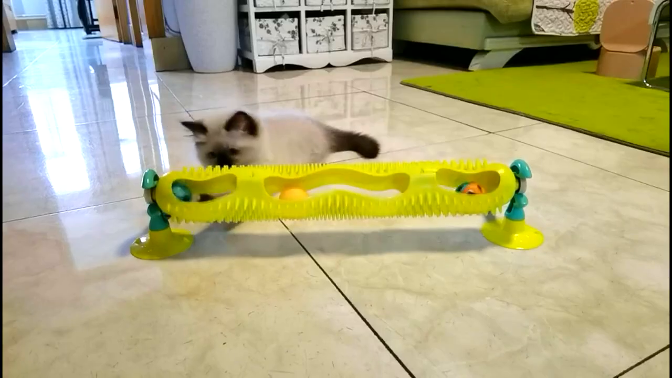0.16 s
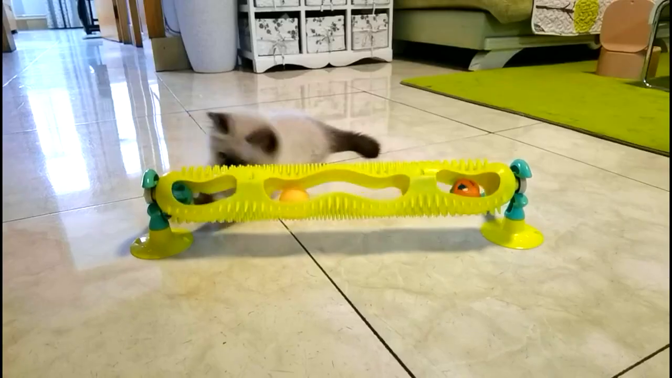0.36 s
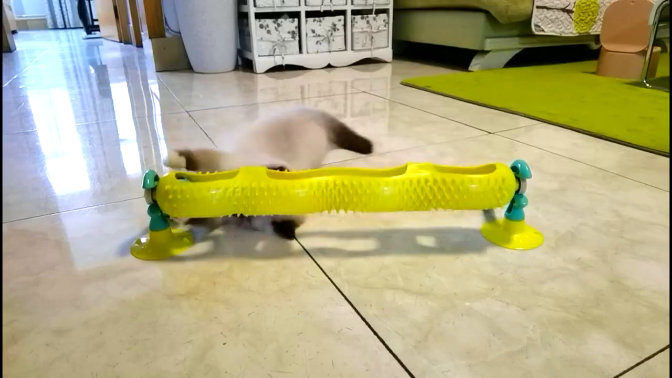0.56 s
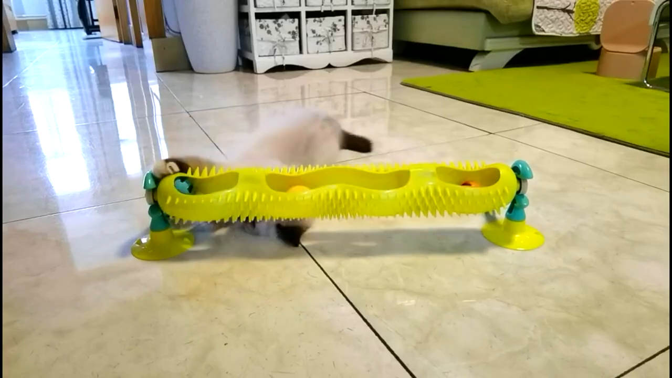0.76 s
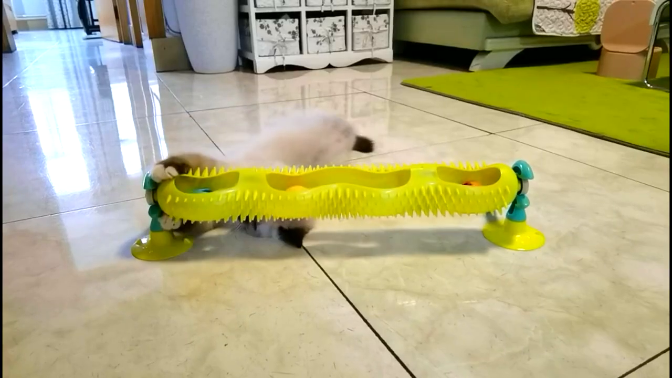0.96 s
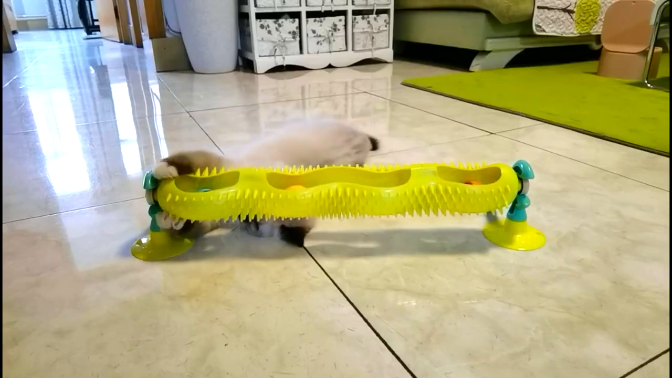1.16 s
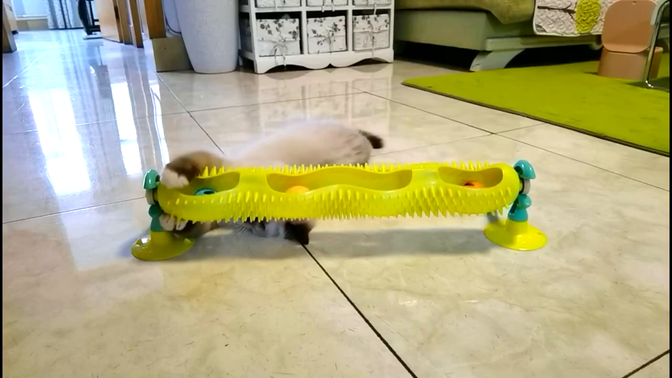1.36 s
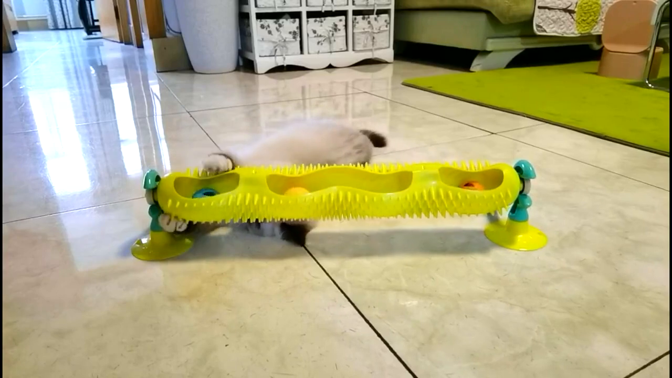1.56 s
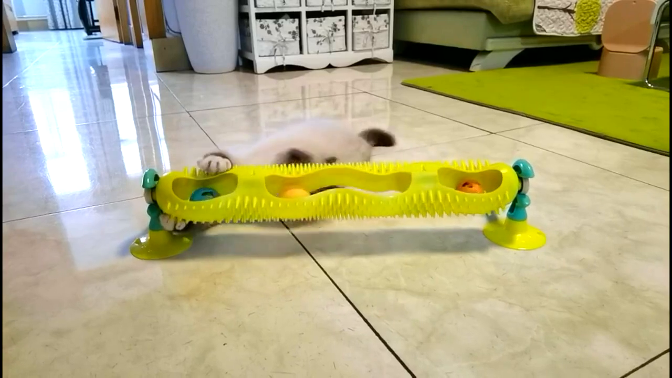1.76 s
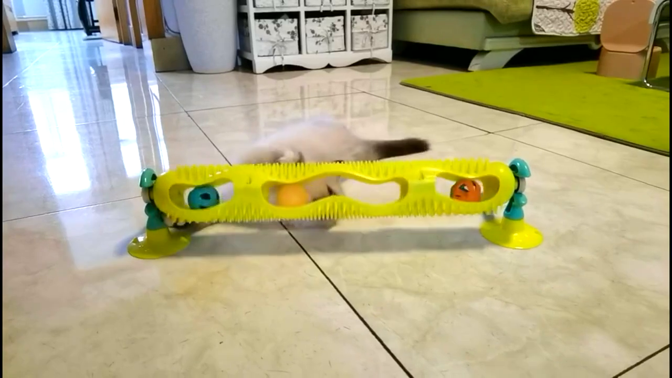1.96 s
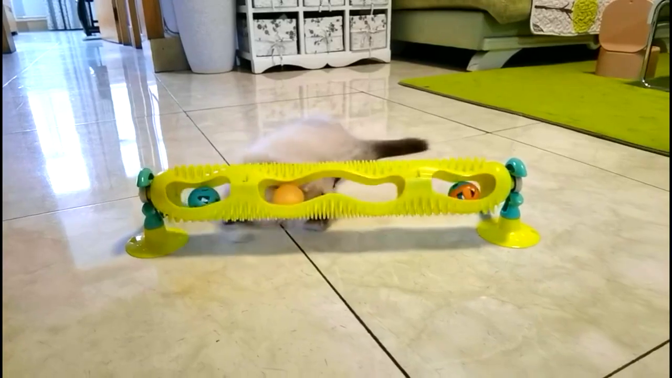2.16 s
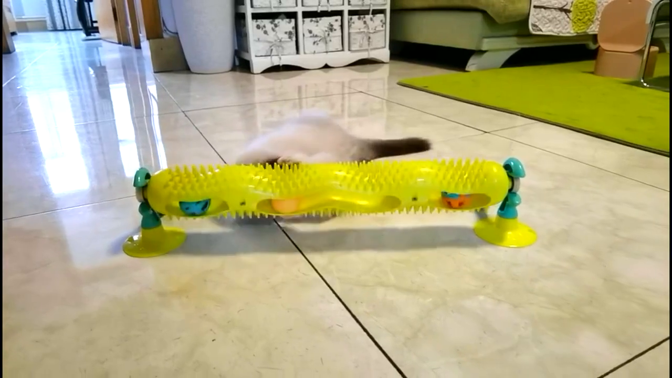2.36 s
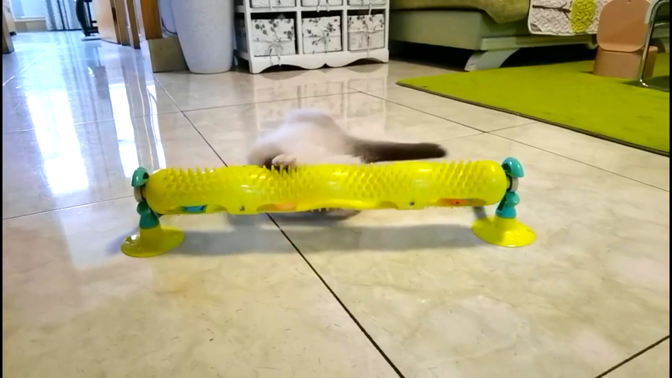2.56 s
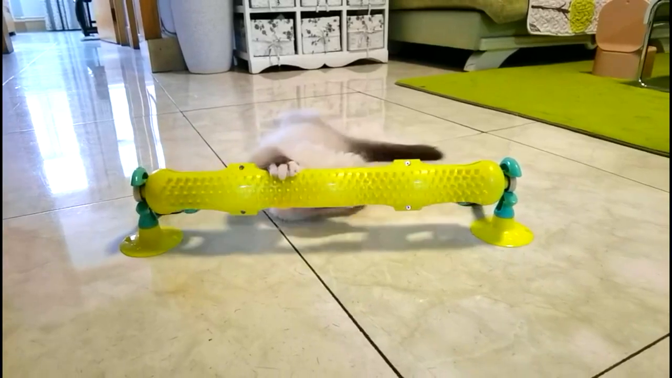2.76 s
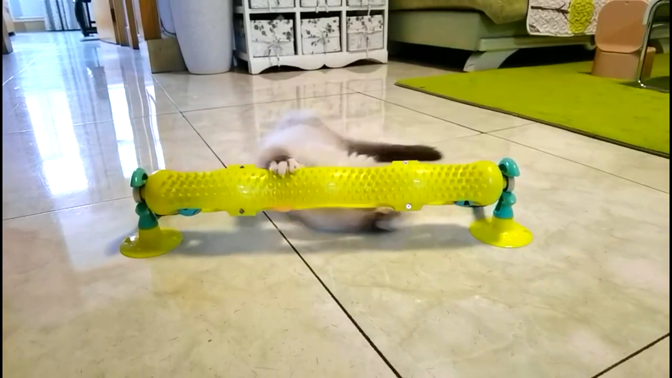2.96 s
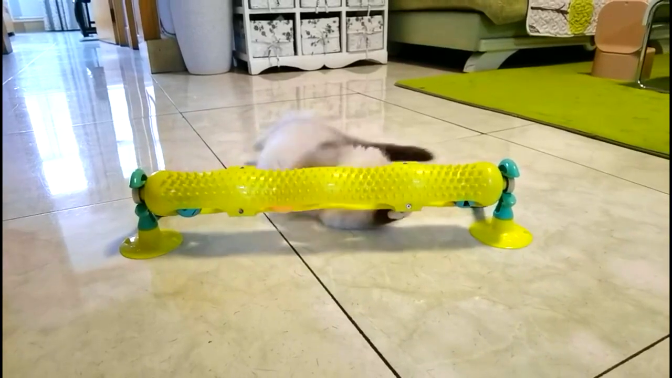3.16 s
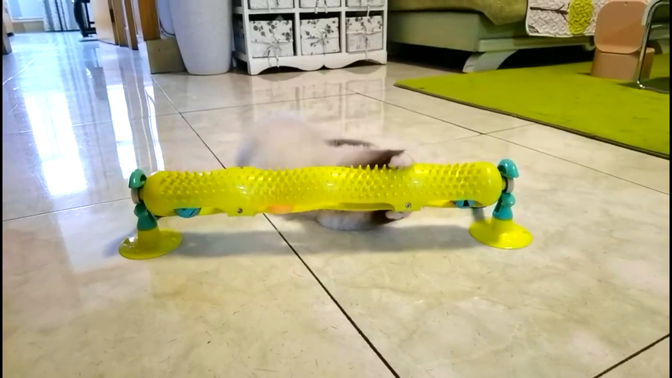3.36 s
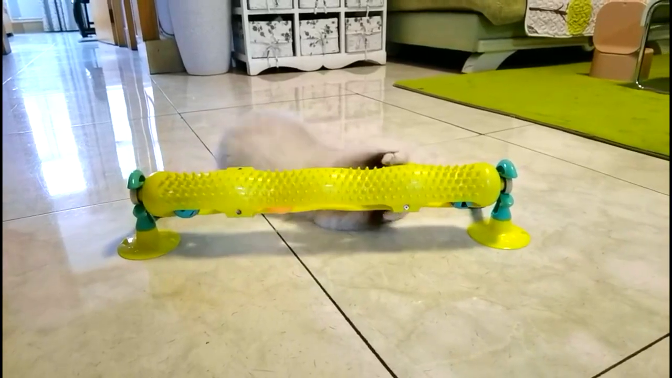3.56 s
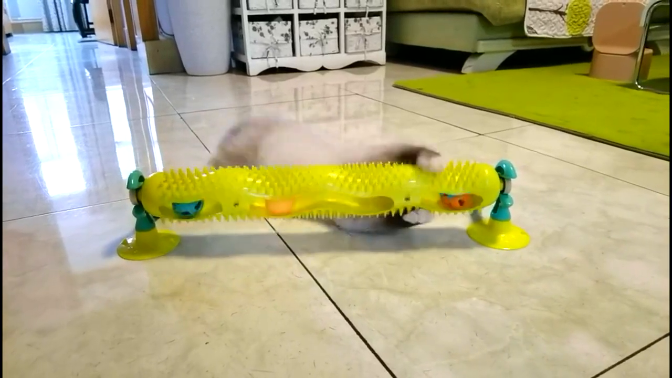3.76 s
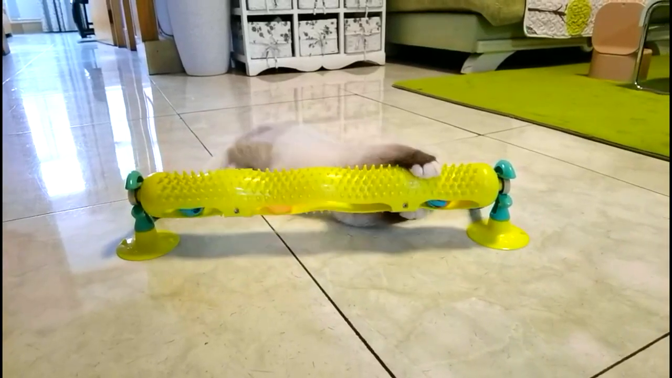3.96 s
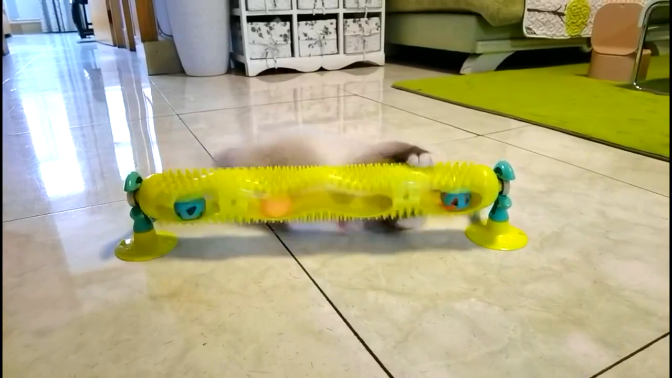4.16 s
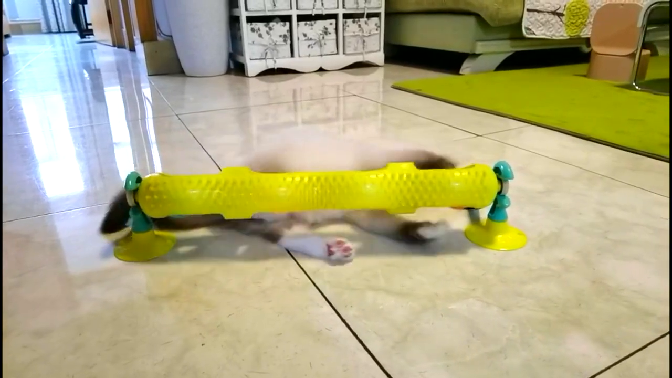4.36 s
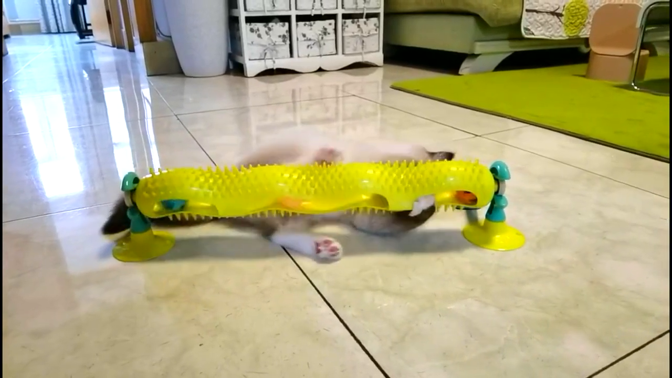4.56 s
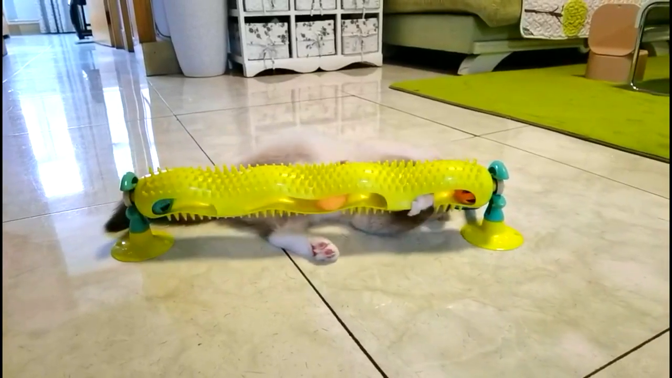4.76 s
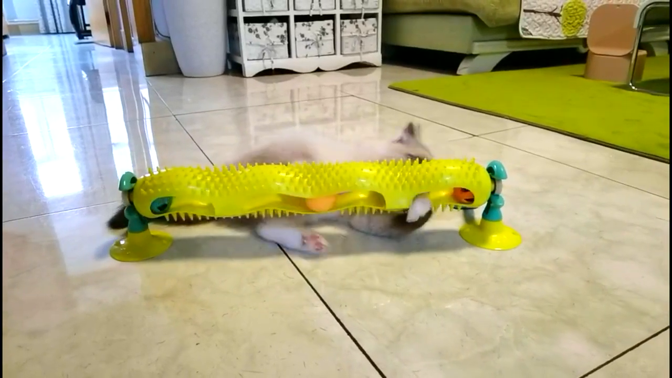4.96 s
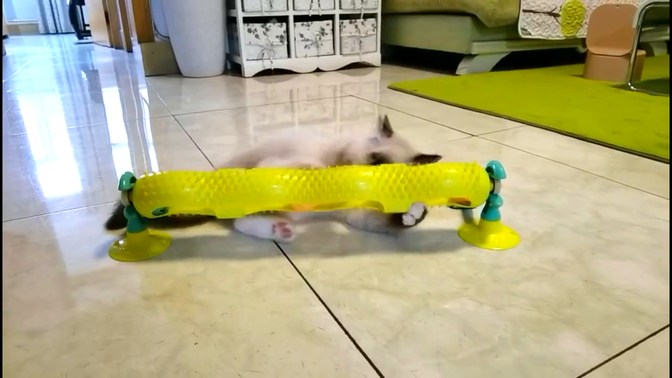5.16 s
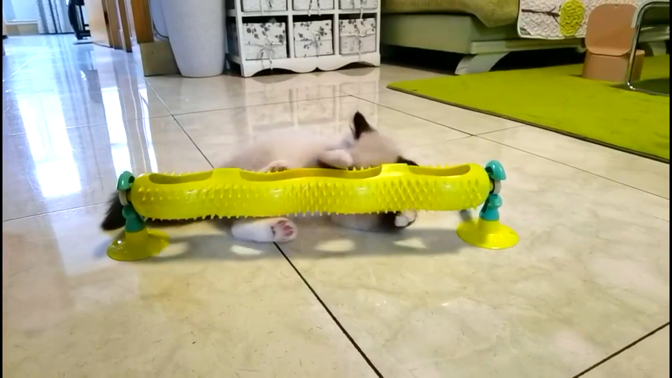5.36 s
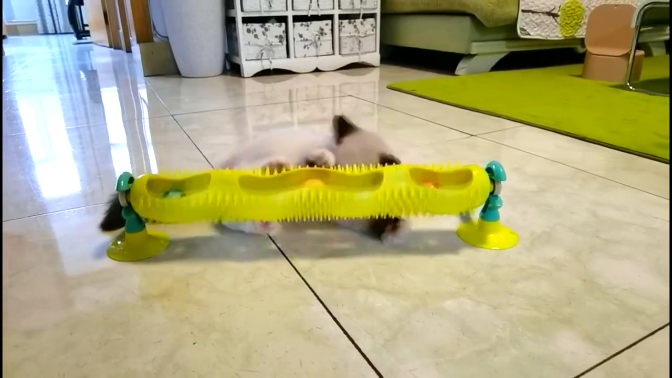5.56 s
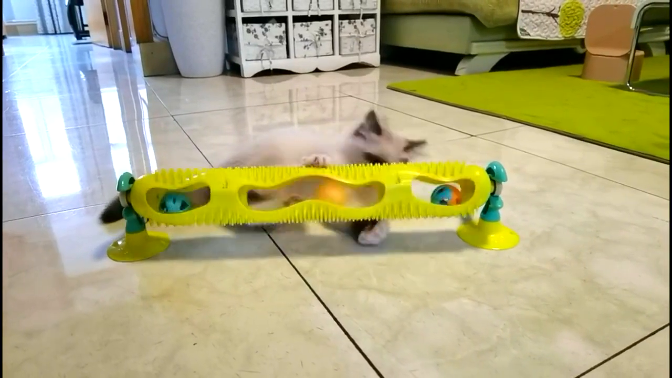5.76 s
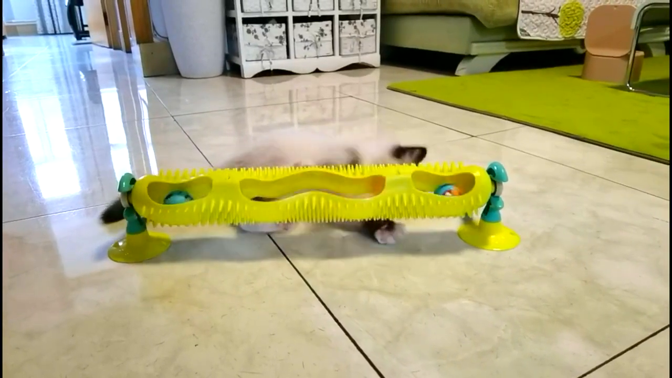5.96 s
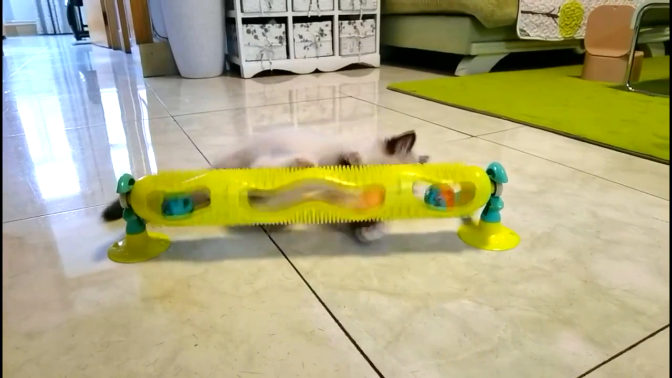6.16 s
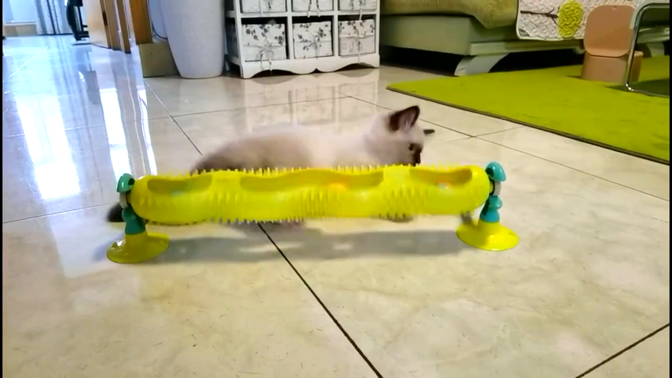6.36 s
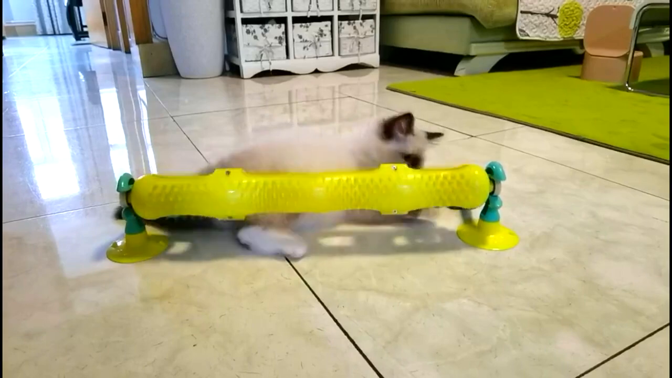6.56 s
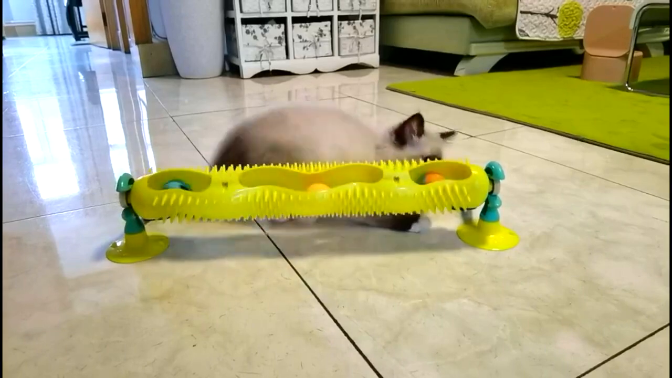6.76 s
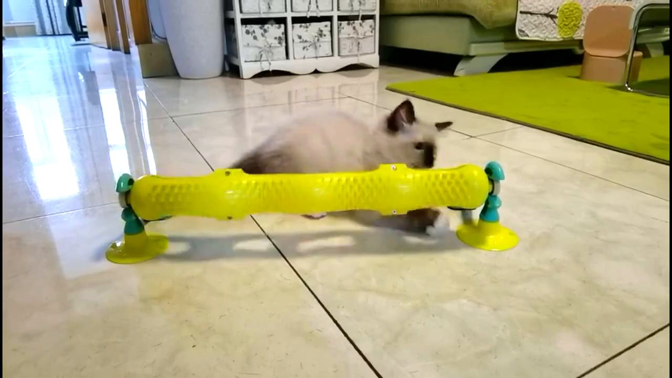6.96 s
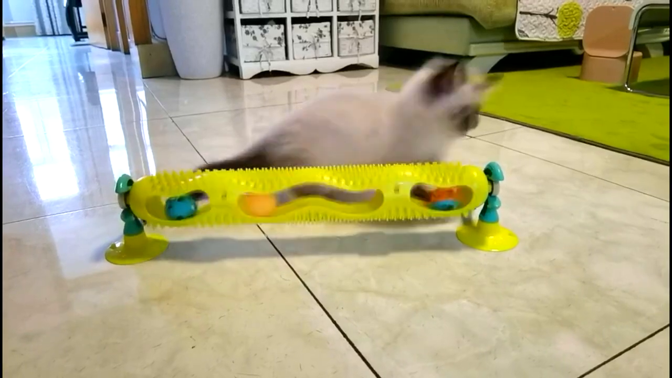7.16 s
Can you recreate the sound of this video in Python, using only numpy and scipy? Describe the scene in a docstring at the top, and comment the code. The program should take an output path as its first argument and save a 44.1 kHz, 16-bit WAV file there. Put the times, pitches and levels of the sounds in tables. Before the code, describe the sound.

A kitten bats a pivoting plastic tube on a tiled living room floor. Small hollow balls click and rattle in quick bursts, with brief rolling and dry claw scrapes. A busy opening fades to near quiet before two seconds, then light ticking, another lull, and stronger rattles with low stand thumps from about four seconds. Close stereo microphone, short room reflections, faint air and hum.

```python
"""In a tiled living room a kitten bats at a plastic tube that pivots on two suction feet.
Hollow balls in the tube click as resonators driven by short impacts, each doubled by a reflection off the tiles.
Rolling, claw scrapes and stand rumble are random impacts filtered by spectra and shaped by strokes.
Decaying noise forms the room's reverberation; filtered noise and wavering sines form the air and the
faint hum of an appliance. Phase and level differences between left and right give the stereo image."""
import sys
import numpy as np
from scipy import signal
from scipy.fft import rfft, irfft, next_fast_len
from scipy.io import wavfile
from scipy.ndimage import map_coordinates

SR = 44100
rng = np.random.default_rng(int(sys.argv[2]) if len(sys.argv) > 2 else 0)


def dump(signal):
    """Clip the signal to [-1, 1] and save it as 16-bit WAV at the path in sys.argv[1]."""
    limited = np.clip(np.atleast_2d(signal).T, -1, 1)
    pcm = np.round(limited * 32767).astype(np.int16)
    wavfile.write(sys.argv[1], SR, pcm)


N = 318388  # samples in the scene

# still air, relative spectrum: [f/Hz, level/dB]
AIR_SPECTRUM = [(20, -1), (75, -6.5), (106, -8.5), (141, -8.5), (300, -11.5), (350, -16), (480, -14),
                (670, -21), (960, -25), (3300, -39), (7500, -36), (10000, -41.5)]
# partials of the appliance: [f/Hz, rms level/dB]
HUM_PARTIALS = [(72, -78), (141, -77), (215, -93.5), (497, -81.5)]
# paw strokes that swing the tube: [t/s, hold/s, rolling level/dB, scraping level/dB], levels before trim
PAW_SWIPES = [ (0.0, 0.11, -56, -66), (0.135, 0.051, -49, -58.5), (0.24, 0.25, -65, -96),
              (0.41, 0.2, -54, -65.5), (0.845, .07, -54.5, -61), (1.0, 0.037, -74, -71),
              (1.996, 0.15, -59.5, -64.5), (2.241, 0.073, -65, -80), (2.642, 0.029, -58, -62.5),
              (2.73, 0.15, -73.5, -82), (3.02, 0.15, -82, -89), (3.515, 0.017, -68.5, -72.5),
              (3.711, 0.082, -50.5, -55.5), (4.127, 0.12, -59.5, -54.5), (4.26, 0.24, -52, -61),
              (4.51, 0.17, -57.5, -67), (5.03, 0.054, -58.5, -71.5), (5.329, 0.036, -50, -59),
              (5.399, 0.12, -83, -90), (5.549, 0.11, -64, -69.5), (5.7, 0.1, -58, -74),
              (5.914, 0.033, -56, -77), (6.144, 0.042, -52, -58.5), (6.313, 0.086, -49.5, -51),
              (6.47, 0.053, -49, -51.5), (6.928, 0.14, -52, -69), (7.08, 0.077, -57, -59.5)]
# the kitten shakes the stand on its suction feet: [t/s, rumble level/dB before trim]
STAND_JOLTS = [ (2.635, -55), (3.73, -55.5), (4.139, -53), (4.253, -45), (4.372, -48), (4.419, -55.5),
               (4.54, -55.5), (4.67, -55.5), (5.322, -49.5), (6.355, -47), (6.512, -46.5), (6.909, -53)]
# rolling balls, relative spectrum: [f/Hz, level/dB]
ROLL_SPECTRUM = [(120, -49), (300, -18.5), (600, 1), (950, -2.5), (1550, -1.5), (1800, -4.5), (2030, 6.5),
                 (2230, -6.5), (2450, 9.5), (2750, -10), (3200, -12.5), (5000, -18.5), (9000, -37.5)]
# hard ticks and claw scrapes, relative spectrum: [f/Hz, level/dB]
TICK_SPECTRUM = [(1500, -33.5), (2800, 6.5), (3400, -1), (4050, 7), (4400, 2), (5200, 1), (5950, 4.5),
                 (6700, -1), (7350, -3.5), (8200, 2.5), (9400, 4.5), (11000, -57.5)]
# shaken stand, relative spectrum: [f/Hz, level/dB]
RUMBLE_SPECTRUM = [(40, -9), (75, 6), (110, -4), (170, -1), (290, 7), (500, -14.5), (900, -15)]
# contacts of balls, tube and claws: [t/s, level/dB over the first 5 ms, knock share/dB,
# tick share/dB before brightening, favoured ring f/Hz, tick centre f/Hz, buzz decay/ms before its floor]
CONTACTS = [(0.003, -48, -14, -29.5, 2370, 3540, 0.6), (0.03, -41.5, -24, -7, 2450, 5600, 0.88),
            (0.0707, -30.5, -10, -6.5, 2200, 6500, 1.1), (0.156, -47, -1.5, -21, 1600, 4700.0, 0.89),
            (0.1925, -37, -8.5, -11, 2007, 7600, 2), (0.298, -56, 1, -23, 966, 3500, 1.7),
            (0.322, -49, -2.5, -18, 2020, 3500.0, 2.5), (0.343, -47, -5.5, -16, 1980, 3500.0, 0.8),
            (0.388, -55, -6.5, -28, 1600, 7450, 0.78), (0.399, -33, -12, -12.5, 2107, 7300, 1.2),
            (0.456, -44.5, -21.5, -21.5, 2150, 7450, 2.5), (0.467, -53, -3, -20.5, 2430, 4530, 1.0),
            (0.5005, -41, -7, -9.5, 1015, 6050, 3), (0.508, -41, -8.5, -2, 2440, 3900, 1.0),
            (0.5136, -40.5, -7, -27, 2143, 4620, 0.28), (0.549, -42, -8.5, -11.5, 1960, 7000, 1.9),
            (0.5546, -31.5, -4, -31, 1890, 7500, 0.34), (0.661, -47, -4.5, -15, 2460, 6400, 0.68),
            (0.811, -45, -3, -13, 1995, 5370, 0.44), (0.837, -30.5, -7, -8.5, 1840, 5140, 0.55),
            (0.886, -41, -1.5, -13, 1220, 5840, 0.54), (0.903, -46.5, -0.5, -21, 804, 7700.0, 0.55),
            (0.993, -54, -6.5, -15, 2000, 6840, 6.1), (1.027, -50, -8.5, -12.5, 2340, 5400, 2.8),
            (1.107, -58, -4.5, -13, 1970, 5200.0, 7.1), (1.123, -54.5, -24.5, -4, 2470, 5370, 2.7),
            (1.999, -53, -25, -9, 2470, 4300.0, 2.2), (2.015, -50.5, -1.5, -6.5, 2400, 5640, 0.39),
            (2.066, -49.5, -9, -16, 2260.0, 4870, 1.2), (2.116, -57.5, -12, 1, 1840.0, 6450, 4.2),
            (2.133, -52.5, -6.5, -20, 2130, 5260, 2.5), (2.151, -54.5, -14, -11, 2180, 5300, 5.5),
            (2.236, -60.5, -16, -10, 2400, 4300.0, 16), (2.355, -48.5, -12.5, -25, 2420, 3700.0, 1.7),
            (2.465, -55, -12.5, -22, 2390, 6040, 1.6), (2.499, -56, -4.5, -29, 2280, 6600.0, 0.95),
            (2.53, -57.5, -5, -27, 2160.0, 6400.0, 2.1), (2.55, -53.5, -9, -18, 1970, 6900.0, 2),
            (2.585, -56.5, -16, -11.5, 1990, 5300.0, 0.88), (2.619, -44.5, -10.5, -5, 2340.0, 4670, 1.3),
            (2.631, -39, -10, -6.5, 2600, 3380, 1.4), (2.657, -48.5, 1, -6, 1250, 4200.0, 8.7),
            (2.664, -46, -2, -13, 2080, 3900.0, 0.6), (2.693, -46.5, -2.5, -3.5, 1050, 6600, 4.5),
            (2.762, -59.5, -17, -14, 1930, 4200.0, 4.5), (2.879, -55.5, -24, -2, 2750, 6400, 4.8),
            (2.889, -54.5, -26, 5, 2710.0, 4830, 2.9), (2.974, -63, -17, 1, 2620.0, 6040, 3.2),
            (3.022, -61, -26, -15, 2770, 5330, 12), (3.085, -67, -23, -24, 2540, 6560, 0.63),
            (3.15, -68, -14, -22, 2580, 5700.0, 0.6), (3.242, -67.5, -3, -15, 2590, 5700, 3),
            (3.705, -47.5, -49.5, -5, 2580, 8140, 1.8), (3.749, -47.5, -11.5, -29, 2300, 7000.0, 0.29),
            (3.775, -47, -4, -17, 2080, 6540, 3), (3.794, -43, -8, -7, 2500, 5670, 0.6),
            (3.805, -47, -7, -9, 2190.0, 6840, 0.43), (3.864, -58, -37, -18, 2430.0, 4700.0, 0.59),
            (3.904, -52, -23, -20, 2040, 4100.0, 0.55), (3.975, -59, -2.5, -21, 2380, 5700.0, 4.6),
            (4.03, -58.5, -4.5, -23, 2030, 7100.0, 3.5), (4.062, -53, -7.5, -29, 1940, 4900.0, 0.84),
            (4.07, -57.5, -1, -35, 2010, 5000.0, 0.44), (4.134, -45, -4, -11, 2400, 7100, 9),
            (4.141, -37, -10, -13, 2250, 7450, 0.78), (4.256, -32, -6.5, -7.5, 1260, 4300, 3.7),
            (4.274, -45, 0.5, -16, 1100, 7000, 1.1), (4.315, -46, -6.5, -2.5, 2430, 6200, 1.1),
            (4.365, -41, -7, -12, 2290, 6400.0, 4.7), (4.376, -30, -6.5, -12.5, 2510, 6000, 6.4),
            (4.392, -40.5, -8, -5.5, 2430, 5840, 9.1), (4.409, -42, 8, -22, 870, 5800, 1.6),
            (4.425, -44.5, -8.5, -18.5, 1100, 6500.0, 0.14), (4.44, -43, -3.5, -4, 2470.0, 5840, 1.7),
            (4.511, -39.5, -3.5, -19, 1520, 5130, 3), (4.539, -31.5, -10.5, -14, 2040, 8300, 2.3),
            (4.544, -39, -2.5, -8, 2000, 8300.0, 1.9), (4.557, -36, -3, -12, 1550, 3260, 5.2),
            (4.66, -40.5, -14.5, -12.5, 2500, 4330, 0.65), (4.67, -38.5, -5, -11, 2420, 3800, 1.7),
            (4.688, -50, 5.5, -3, 2070.0, 6800, 0.78), (4.908, -33, -21.5, -7.5, 2050, 4040, 0.2),
            (4.9087, -37, 1.5, -9, 1560, 5200, 1.2), (5.221, -45.5, -7.5, -14, 2230, 3650, 6.5),
            (5.278, -43, -12.5, -16, 2460, 3380, 5.9), (5.299, -48.5, -2, -8, 2310.0, 6960, 5.9),
            (5.321, -36.5, -6, -9.5, 2210, 8600, 1.5), (5.345, -36.5, -3, -10, 2100, 4700, 7.4),
            (5.365, -46, -4.5, -15, 650, 4300.0, 2.9), (5.483, -48.5, -6, -4.5, 2780, 4100, 11),
            (5.697, -44.5, -11, -12.5, 2540, 4300.0, 2.3), (5.708, -48.5, -6.5, -24, 2390, 5100.0, 0.55),
            (5.727, -51.5, -6, 5, 2370, 6000, 2.4), (5.757, -46, -8, -4, 2210, 6500.0, 11),
            (5.852, -57, -10, -2, 1960, 4350, 3), (5.882, -46.5, -5, -11.5, 1920, 4300, 1.1),
            (5.907, -42.5, -1, -14, 1420, 4000, 0.41), (5.922, -50.5, -2, -6, 2470, 3880, 0.43),
            (5.935, -55, 1, -28, 1210, 4000, 4.6), (6.062, -56.5, -11, -14, 2030, 7550, 0.53),
            (6.153, -38.5, -18.5, -4.5, 2420, 7160, 4), (6.16, -42.5, -10, -19, 2340, 6400, 2.5),
            (6.189, -43, -6, -21.5, 2300, 7400.0, 1.9), (6.229, -49.5, -19, 2, 2260, 7060, 3.3),
            (6.335, -45, -5, -6, 2470.0, 5200.0, 11), (6.352, -35.5, -7.5, -9, 2015, 5160, 3.1),
            (6.357, -35, -7, -32, 2060.0, 4300.0, 0.55), (6.381, -43.5, -2, -0.5, 2240.0, 6100.0, 0.55),
            (6.467, -26, -12, -15.5, 2440, 5940, 3), (6.489, -35.5, 4.5, -0.5, 1150, 5400.0, 0.4),
            (6.501, -38.5, -1.5, -3, 2370, 5930, 6.2), (6.509, -34.5, -7.5, -4.5, 2400, 6100, 6.7),
            (6.524, -45, -9, -4, 2430, 5900, 2), (6.537, -38, -21, -19, 2510, 4770, 2.3),
            (6.553, -37.5, -28, -3.5, 2370, 5400, 0.84), (6.86, -59.5, -8, -10, 2530, 8400, 20),
            (6.908, -35.5, -3, -8, 2240, 5350, 6.8), (6.919, -35.5, -7, -9.5, 2730, 4960, 0.26),
            (6.941, -47, -2.5, -10, 1800, 5270, 8.1), (6.969, -50, -2.5, -7, 620, 5700.0, 5.9),
            (7.019, -46.5, -8, 1.5, 2520, 4300, 0.94), (7.08, -45.5, -3, -10, 600, 4710, 2.7),
            (7.089, -42.5, -28, -19, 2280, 6200.0, 1.6), (7.152, -46, -3, -8, 1500, 6500, 0.69),
            (7.175, -49.5, -15, -27, 2380, 5200.0, 0.73), (7.2, -46, -10.5, -15.5, 2280, 4740, 2.1)]
# resonances of the hollow balls: [f/Hz before detuning, nominal width/Hz, relative level/dB]
BALL_RESONANCES = [(2037, 250, 0.5), (2409, 290, 1), (2750, 90, -0.5)]
# tube knock, relative spectrum: [f/Hz, level/dB]
KNOCK_SPECTRUM = [(100, -23.5), (280, -15), (430, -7.5), (560, 0), (750, -2), (950, 2.5), (1250, -0.5),
                  (1550, 4), (1850, -9.5), (3000, -34.5)]
# the play moves along the tube: [t/s, mean phase by which the ring leads on the left/rad]
PLAY_BEARING = [(1.1, -0.62), (2.2, 0.43), (4.4, 0.16), (6.4, -0.22)]
# how far each frequency takes on its contact's own lead: [f/Hz, share]
RING_LEAD_SHARE = [(700, 0.1), (2100, 0.65), (3000, 0.3), (4500, 0.043)]
# reverberation time: [f/Hz, time to fall 60 dB/s]
ROOM_T60 = [(200, 0.32), (800, 0.3), (2200, 0.17), (5500, 0.24), (10000, 0.067)]
# phase between left and right, by frequency: [f/Hz, phase by which left leads/rad]
LEFT_LEAD_PHASE = [(2800, 0.97), (3900, -2.5), (5300, -2.5), (6400, -5)]
# gain of the half-difference between left and right: [f/Hz, level/dB]
SIDE_GAIN = [(250, -12.5), (600, -9.5), (1100, -6), (2200, -0.5), (4600, -1), (7000, -3.5)]

# the balls coast on after the claws let go
SWIPE_ATTACK_S, ROLL_FALL_DB_PER_S, SCRAPE_FALL_DB_PER_S = 0.018, 194, 301
JOLT_ATTACK_S, JOLT_HOLD_S, JOLT_FALL_DB_PER_S = 0.0081, 0.0097, 288.5
BEARING_SPREAD_RAD = 0.3  # from one contact to the next
PRE_BLOW_S = 1 / 100  # room for the lead-in ahead of each blow
BAND_LIMIT_HZ = 9850


def amp(db):
    """A level in decibels is twenty times the logarithm of the amplitude gain."""
    return 10 ** (np.asarray(db) / 20)


def unit(x):
    """Division by the root mean square sets the rms to 1."""
    return x / np.sqrt(np.mean(x ** 2) + 1e-20)


def along(points, hz):
    """Frequency curves interpolate on a logarithmic axis."""
    f, value = np.transpose(points)
    return np.interp(np.log(hz + 1), np.log(f + 1), value)


def wobble(rate):
    """Spline interpolation of random knots, rate a second, gives a smooth fluctuation."""
    knots = rng.standard_normal(int(N * rate / SR) + 4)
    return map_coordinates(knots, [np.arange(N) * rate / SR])


def ripple(size, order):
    """Smoothed noise over frequency bins, at rms 1, makes a random curve."""
    return unit(signal.fftconvolve(rng.standard_normal(size), np.hanning(order), "same"))


def filtered(x, response):
    """A linear filter multiplies the spectrum by its frequency response."""
    m = next_fast_len(N + SR // 2)
    hz = np.fft.rfftfreq(m, 1 / SR)
    return irfft(rfft(x, m) * response(hz), m)[..., :N]


def causal(gain):
    """Folding the cepstrum yields the minimum-phase impulse response of a gain curve."""
    cepstrum = irfft(np.log(np.maximum(gain, 1e-6)))
    half = len(cepstrum) // 2
    cepstrum[1:half] *= 2
    cepstrum[half + 1:] = 0
    return irfft(np.exp(rfft(cepstrum)))


def coloured(x, spectrum, size=2048):
    """A body convolves its excitation with its impulse response; the result has rms 1."""
    body = causal(amp(along(spectrum, np.fft.rfftfreq(size, 1 / SR))))
    return unit(signal.fftconvolve(x, body)[:N])


def add(track, s, sound):
    """Superposition: sounds sum sample by sample from time s."""
    start = max(round(s * SR), 0)
    part = track[..., start:start + sound.shape[-1]]
    part += sound[..., :part.shape[-1]]


def background(air_db=-68, width=0.42, waver_rad=0.58):
    """Partly correlated coloured noise is the air; phase-modulated sines are the hum."""
    mid, side = (coloured(rng.standard_normal(N), AIR_SPECTRUM, size=8192) for _ in range(2))
    t = np.arange(N) / SR
    hum = np.zeros(N)
    for hz, db in HUM_PARTIALS:
        phase = 2 * np.pi * hz * t + waver_rad * wobble(7.7)
        hum += amp(db) * np.sqrt(2) * np.sin(phase)
    return amp(air_db) * np.array([mid + width * side, mid - width * side]) + hum


def grains(rate, spread_db, hiss):
    """Rough surfaces excite by sparse impacts of uneven size over a smooth hiss."""
    sizes = amp(spread_db * np.clip(rng.standard_normal(N), -2, 2))
    hits = (rng.random(N) < rate / SR) * sizes
    signs = np.sign(rng.standard_normal(N))
    return unit(hits * signs) + hiss * rng.standard_normal(N)


def patchy(x, depth_db, size=512):
    """A smoothed random gain over time and frequency makes the rolling and scraping patchy."""
    z = signal.stft(x, nperseg=size)[2]
    smoothing = np.outer(np.hanning(13), np.hanning(9))  # frequency bins by time frames
    field = signal.fftconvolve(rng.standard_normal(z.shape), smoothing, "same")
    return unit(signal.istft(z * amp(depth_db * unit(field)), nperseg=size)[1][:N])


def stroke(start_s, hold_s, attack_s, fall_db_per_s):
    """A driven motion grows exponentially up to its start, holds, then decays exponentially."""
    t = np.arange(N) / SR - start_s
    swell = np.exp(np.minimum(t, 0) / attack_s)
    return swell * amp(-fall_db_per_s * np.maximum(t - hold_s, 0))


def rolling(roll_db=-3, scrape_db=-2, rumble_db=-3, roll_patchy_db=4.5, scrape_patchy_db=4):
    """Seams under rolling balls, ribs under claws and the shaken stand act as streams of impacts."""
    speed, grip, shake = np.zeros((3, N))
    for s, hold_s, level_db, claw_db in PAW_SWIPES:
        speed += stroke(s, hold_s, SWIPE_ATTACK_S, ROLL_FALL_DB_PER_S) * amp(level_db)
        grip += stroke(s, hold_s, SWIPE_ATTACK_S, SCRAPE_FALL_DB_PER_S) * amp(claw_db)
    for s, level_db in STAND_JOLTS:
        shake += stroke(s, JOLT_HOLD_S, JOLT_ATTACK_S, JOLT_FALL_DB_PER_S) * amp(level_db)
    uneven = amp(3 * wobble(60))
    catches = grains(rate=600, spread_db=3, hiss=0.4)
    seams = grains(rate=240, spread_db=4, hiss=0.22)
    jostles = grains(rate=150, spread_db=5, hiss=0.28)
    roll = amp(roll_db) * patchy(coloured(seams, ROLL_SPECTRUM), roll_patchy_db) * speed
    scrape = amp(scrape_db) * patchy(coloured(catches, TICK_SPECTRUM), scrape_patchy_db) * grip
    rumble = amp(rumble_db) * coloured(jostles, RUMBLE_SPECTRUM) * shake
    return uneven * (roll + scrape) + rumble


def shell(hz, knock_db, tick_db, ring_hz, tick_hz, focus_hz=620, knock_focus_hz=260, knock_lift=2.15,
          tick_focus_hz=2300, bright_db=2.0, ripple_db=3, detune=0.014):
    """Frequency response of one contact: ball, tube and hard tick add as shares of power."""
    f = hz * np.exp(detune * rng.standard_normal())  # the balls differ a little in pitch
    power = np.zeros(len(hz))
    for centre_hz, width_hz, db in BALL_RESONANCES:
        power += amp(db) ** 2 / (1 + ((f - centre_hz) / (width_hz / 2)) ** 2) ** 1.9
    # the spot that is struck favours one resonance; a random ripple roughens knock and tick
    ball = np.sqrt(power) / (1 + ((hz - ring_hz) / focus_hz) ** 2)
    uneven = np.tanh(ripple(len(hz), order=80))
    tube = amp(along(KNOCK_SPECTRUM, f) + ripple_db * uneven)
    tube *= 1 + knock_lift / (1 + ((hz - ring_hz) / knock_focus_hz) ** 2)
    crack = amp(along(TICK_SPECTRUM, f) + 4 * uneven)
    crack /= 1 + ((hz - tick_hz) / tick_focus_hz) ** 2
    knock, tick = amp(knock_db), amp(tick_db + bright_db)
    ball_share = max(1 - knock ** 2 - tick ** 2, 0.1)
    return np.sqrt(ball_share * unit(ball) ** 2 + (knock * unit(tube)) ** 2 + (tick * unit(crack)) ** 2)


def flurry(envelope, apart, rate=SR):
    """Random taps, rate a second, under an envelope: partly different left and right, energy 1 on the left."""
    size = len(envelope)
    taps = (rng.standard_normal(size) + apart * rng.standard_normal((2, size))) * envelope
    taps *= rng.random(size) < rate / SR
    return taps / (np.linalg.norm(taps[0]) + 1e-20)


def strike(t, buzz_s, lead_in_s=0.0032, chatter=0.21, chatter_t60=0.089, chatter_rate=300,
           apart=0.44, mirror=0.37, tile_s=0.0023):
    """A soft noisy lead-in, the blow at t = 0, a buzz of tiny bounces and loose rebounds, all mirrored."""
    after = np.abs(t)
    force = 0.19 * flurry(np.exp(-after / lead_in_s) * (t < 0), apart)
    buzz = flurry(np.exp(-after / buzz_s) * (t > 0), apart)
    force += np.sqrt(buzz_s / 0.0017) * buzz  # a longer buzz carries more energy
    force += chatter * flurry(amp(-60 * after / chatter_t60) * (t > 0), apart, chatter_rate)
    force[:, np.searchsorted(t, 0)] += 0.85  # the blow itself
    # the tiles return a delayed image of the contact
    delay = round(tile_s * SR * rng.normal(1, 0.046))
    return force + mirror * np.roll(force, delay, axis=1)


def click(db, knock_db, tick_db, ring_hz, tick_hz, buzz_ms, lead, scatter=1.0, size=4096):
    """A contact force convolved with a resonant response rings; phase between left and right places it."""
    hz = np.fft.rfftfreq(size, 1 / SR)
    t = np.arange(size) / SR - PRE_BLOW_S
    # the ring has a direction of its own; the treble scatters off the ribs
    phase = lead * along(RING_LEAD_SHARE, hz)
    phase = phase + scatter * np.minimum(hz / 6000, 1) * ripple(len(hz), order=200)
    ring = rfft(causal(shell(hz, knock_db, tick_db, ring_hz, tick_hz)))
    force = strike(t, max(buzz_ms, 0.3) / 1000)
    sound = irfft(rfft(force) * ring * np.exp(0.5j * np.array([[1], [-1]]) * phase))
    first_5_ms = sound.mean(0)[(t >= 0) & (t < 0.005)]
    return amp(db) * sound / np.sqrt(np.mean(first_5_ms ** 2))


def clicks():
    """Impacts of balls, tube and claws superpose, their bearing drifting with the play."""
    track = np.zeros((2, N + SR // 100))  # the extra 10 ms hold the first lead-in
    for s, db, *colour in CONTACTS:
        bearing = np.interp(s, *np.transpose(PLAY_BEARING))
        lead = bearing + BEARING_SPREAD_RAD * rng.standard_normal()
        add(track, s, click(db, *colour, lead))
    return track[:, -N:]


def room(x, width=0.77, onset_s=0.0023, count=48):
    """Reverberation is decaying noise, one decay per frequency, redrawn for each of count stretches."""
    wet = np.zeros((2, N))
    for part in np.array_split(np.arange(N), count):
        hz, t, z = signal.stft(rng.standard_normal((2, SR // 2)), SR, nperseg=256)
        decay = amp(-60 * t / along(ROOM_T60, hz)[:, None])
        tail = signal.istft(z * decay * (1 - np.exp(-t / onset_s)), SR, nperseg=256)[1]
        tail /= np.linalg.norm(tail[0])
        mid, side = signal.fftconvolve(x[part][None], tail, axes=1)
        add(wet, part[0] / SR, np.array([mid + width * side, mid - width * side]))
    return wet


def scene(room_db=-13):
    """Direct and reverberant sound superpose; a phase curve and a side gain set the stereo image."""
    air_and_hum = background()
    toy = rolling() + clicks()
    right_only = np.array([[0], [1]])
    direct = filtered(toy, lambda hz: np.exp(-1j * right_only * along(LEFT_LEAD_PHASE, hz)))
    left, right = direct + amp(room_db) * room(toy.mean(0))
    mid = (left + right) / 2
    side = filtered((left - right) / 2, lambda hz: amp(along(SIDE_GAIN, hz)))
    return np.array([mid + side, mid - side]) + air_and_hum


def record(dry):
    """A very steep low-pass filter removes the energy above the band limit."""
    return filtered(dry, lambda hz: 1 / np.sqrt(1 + (hz / BAND_LIMIT_HZ) ** 160))


dry = scene()
out = record(dry)
dump(out)
```